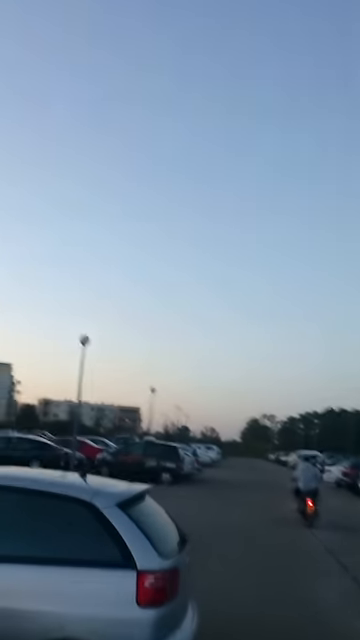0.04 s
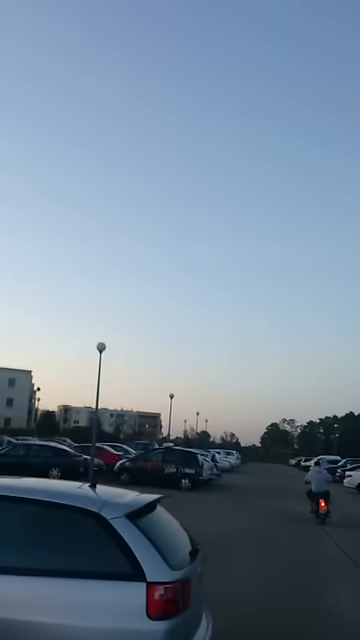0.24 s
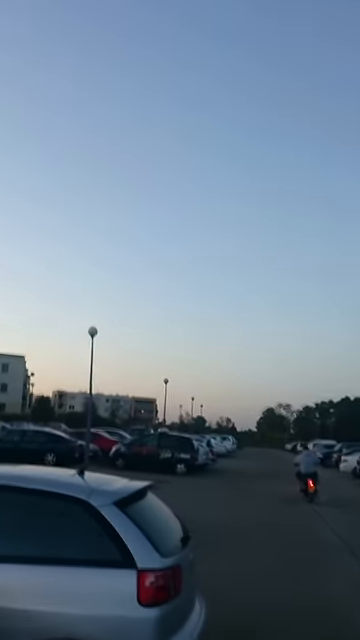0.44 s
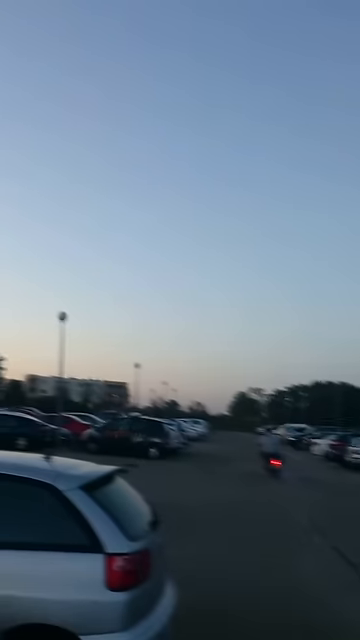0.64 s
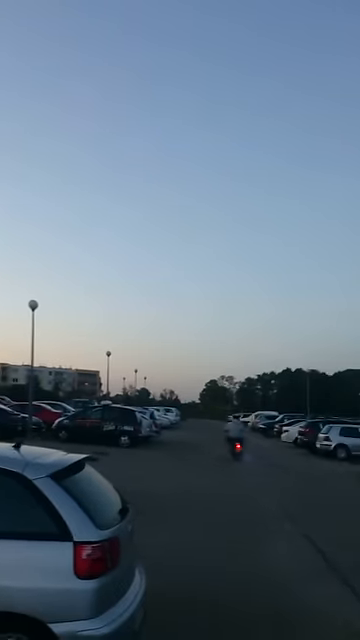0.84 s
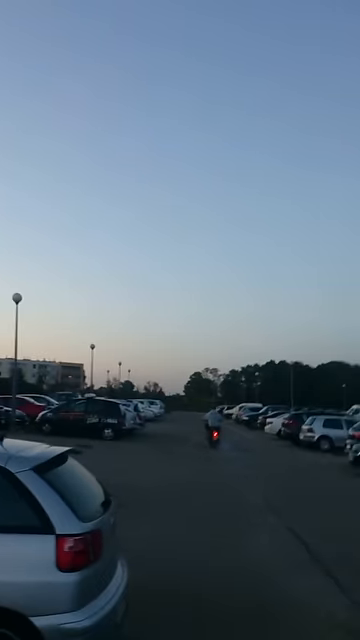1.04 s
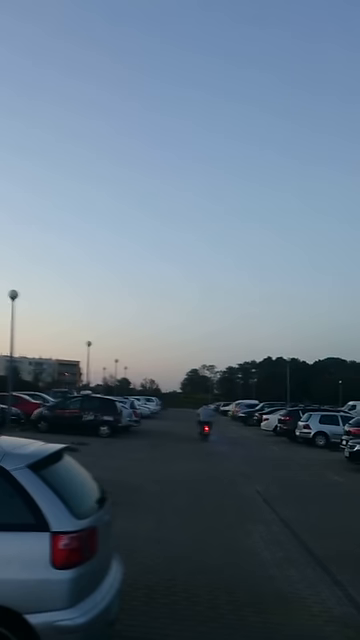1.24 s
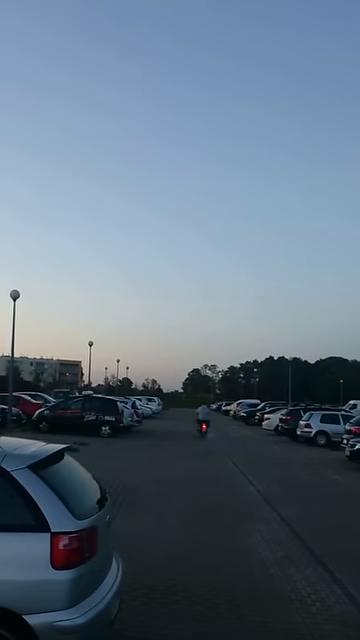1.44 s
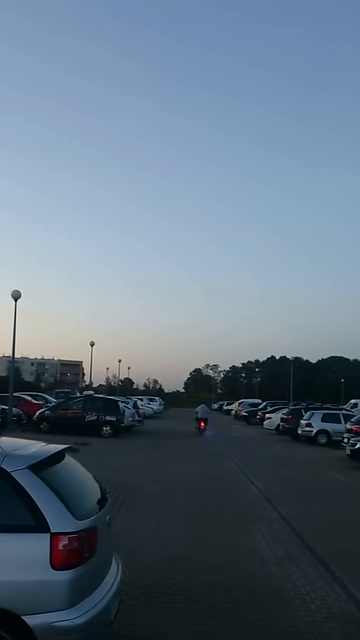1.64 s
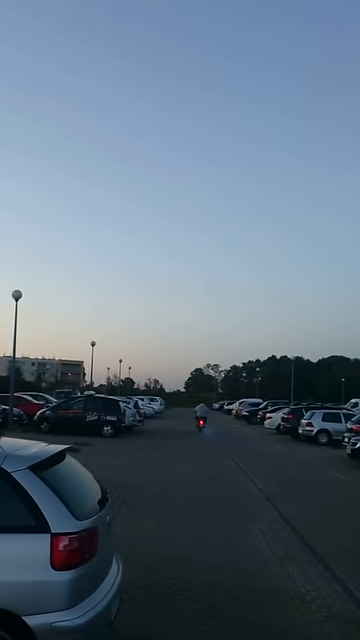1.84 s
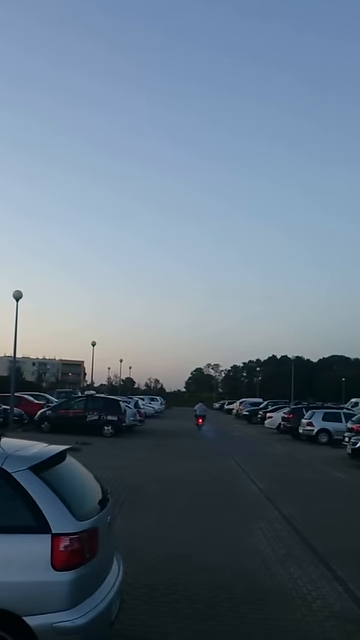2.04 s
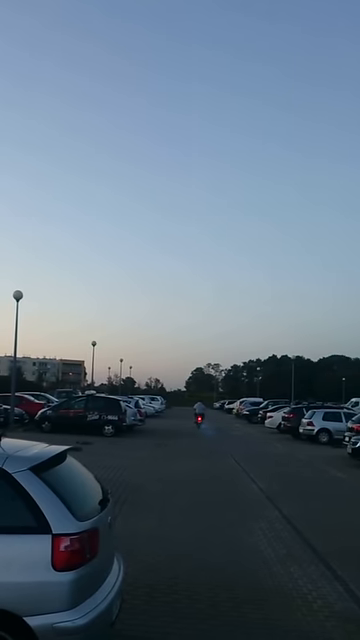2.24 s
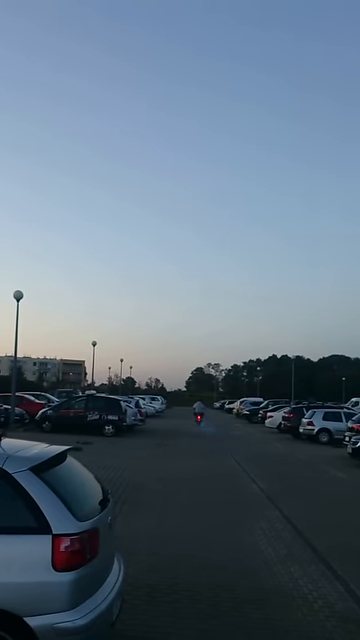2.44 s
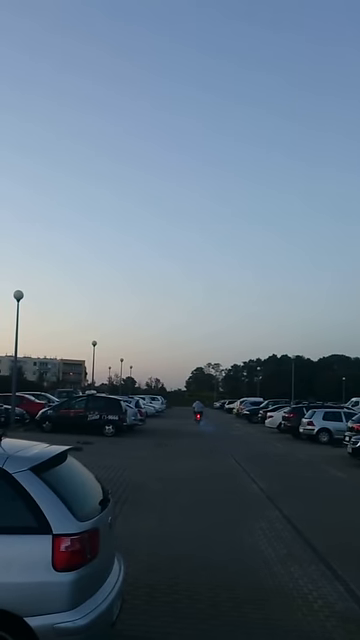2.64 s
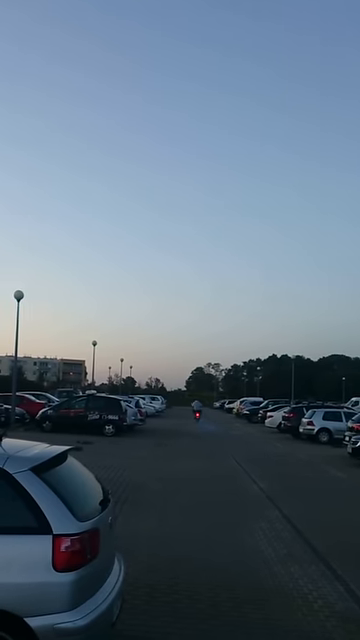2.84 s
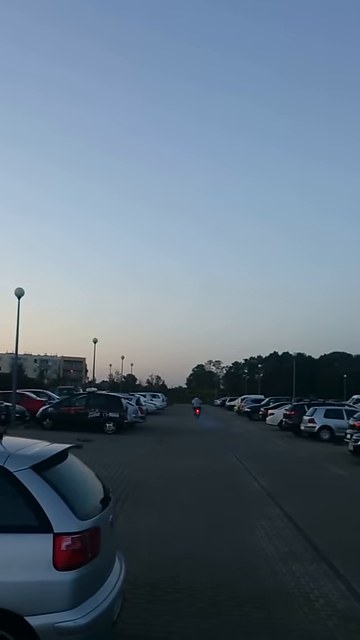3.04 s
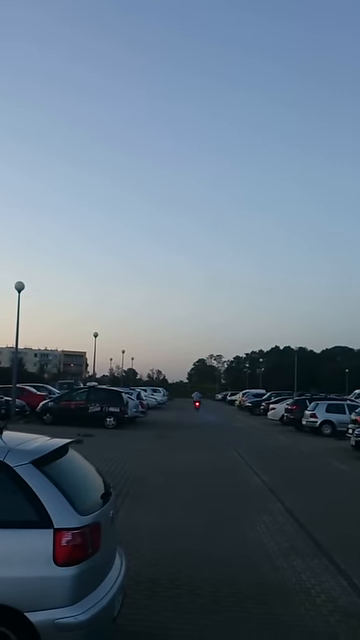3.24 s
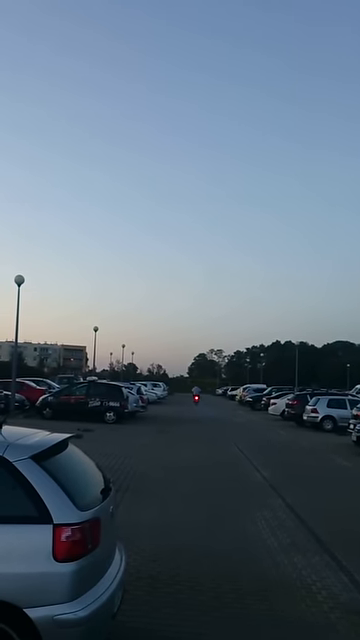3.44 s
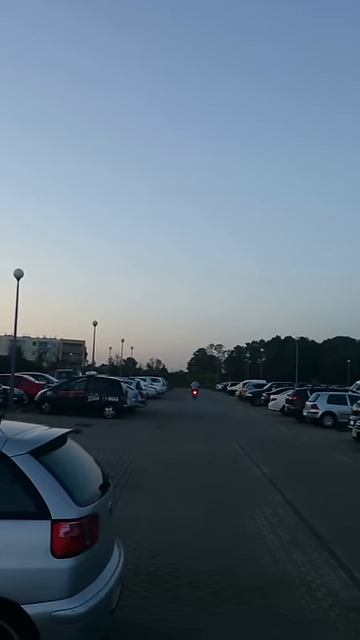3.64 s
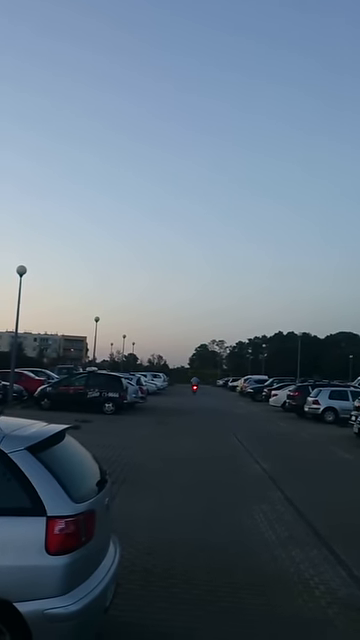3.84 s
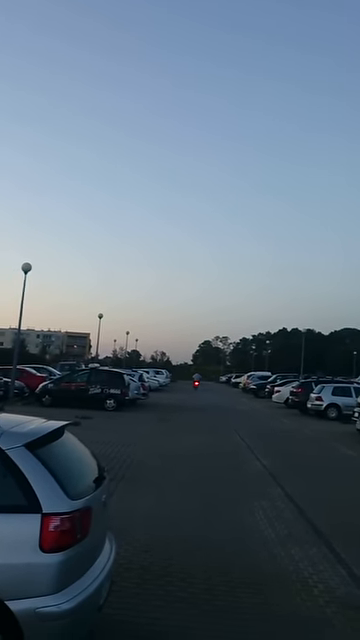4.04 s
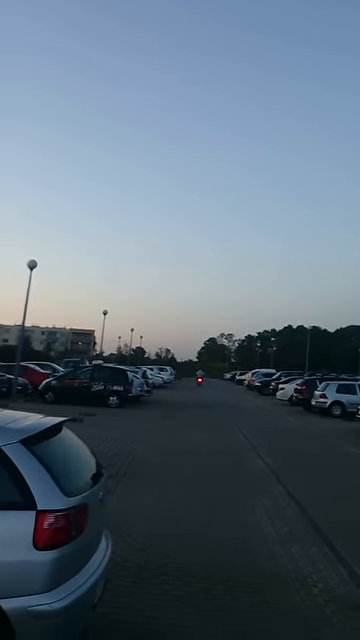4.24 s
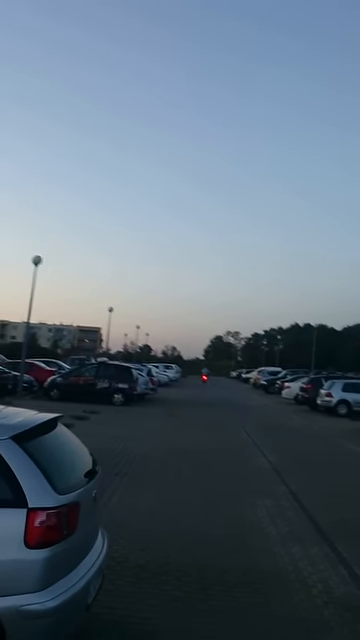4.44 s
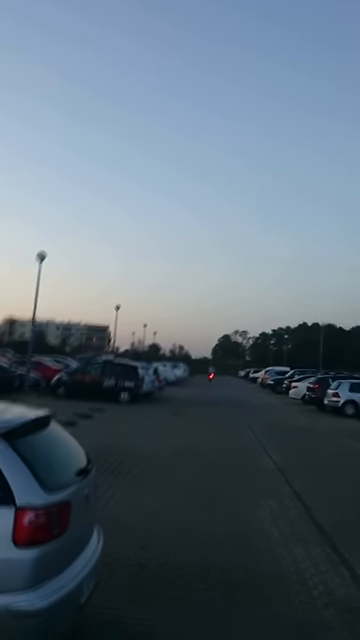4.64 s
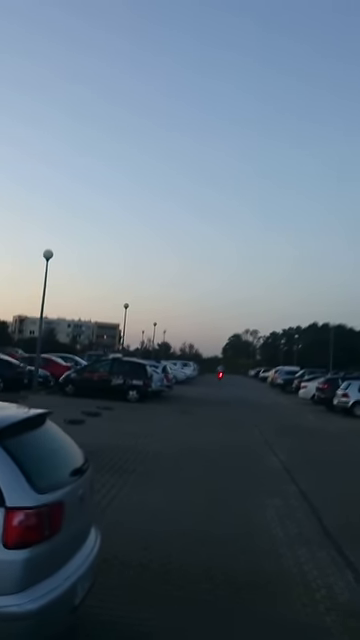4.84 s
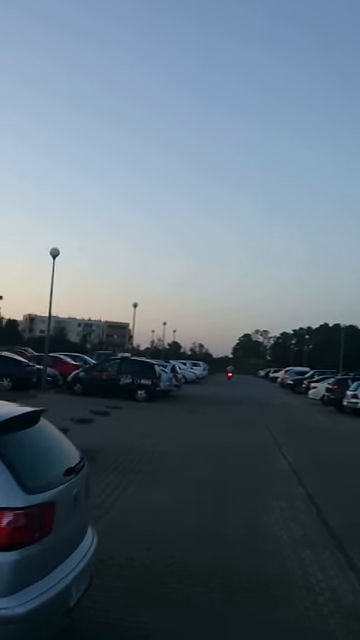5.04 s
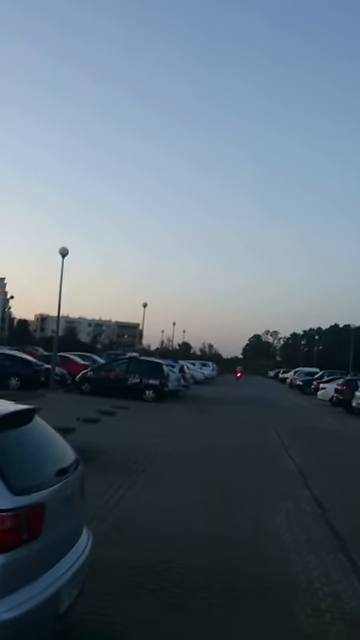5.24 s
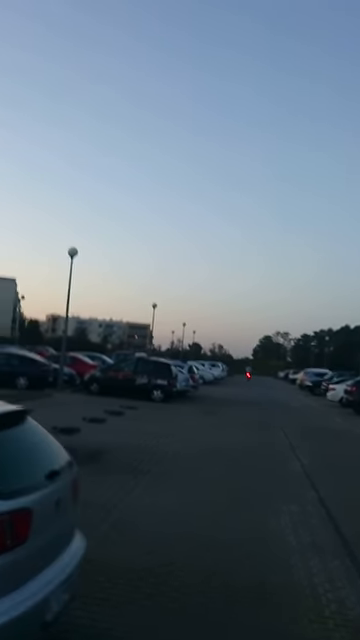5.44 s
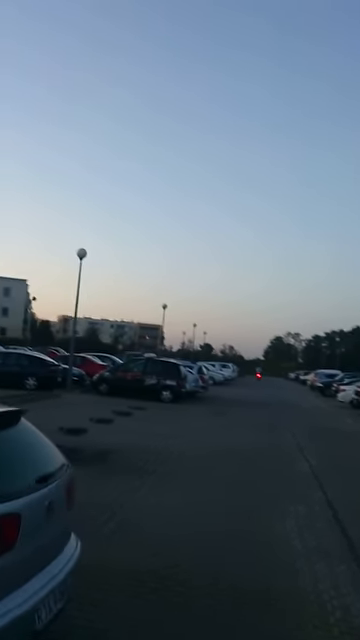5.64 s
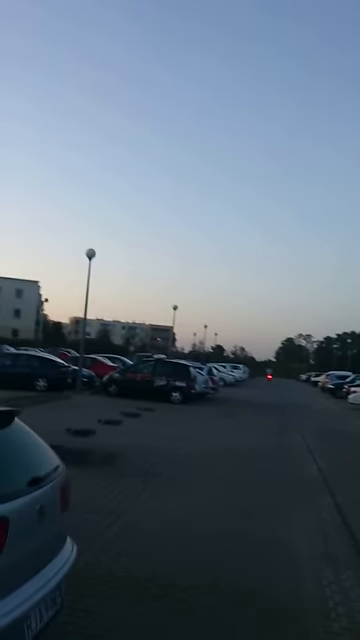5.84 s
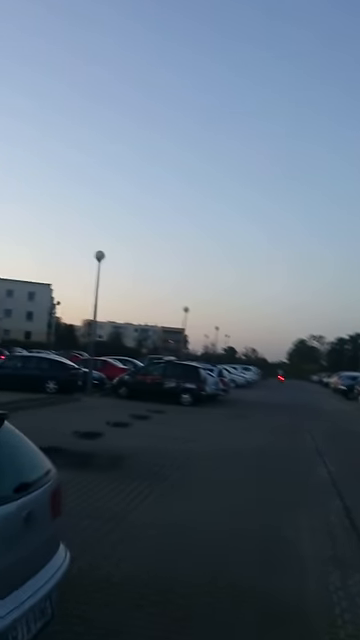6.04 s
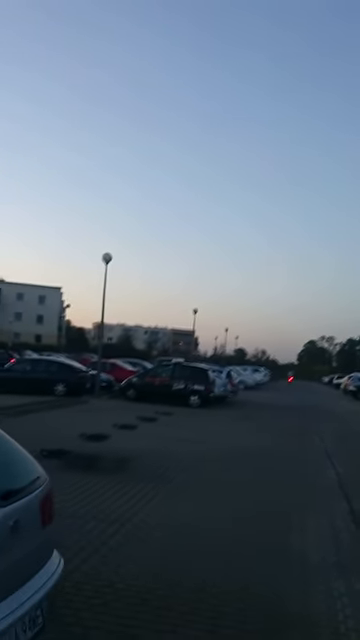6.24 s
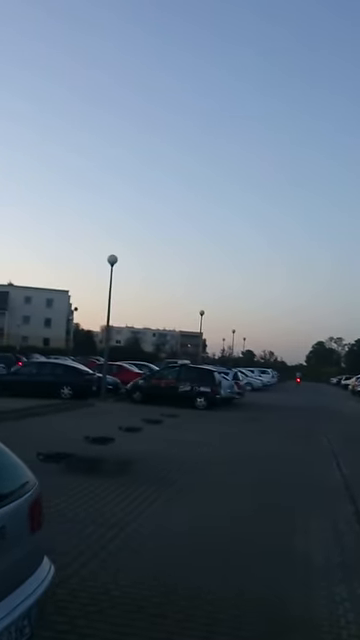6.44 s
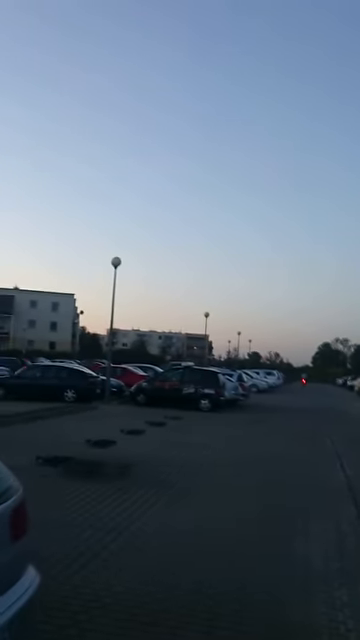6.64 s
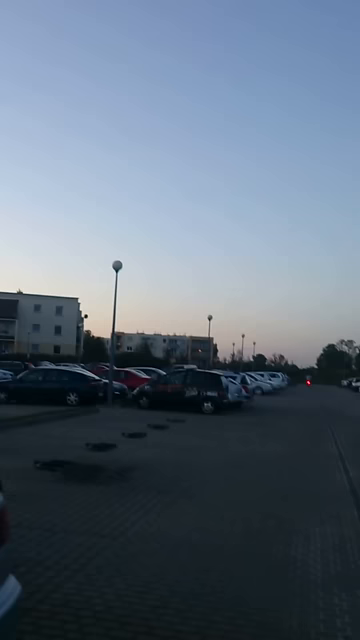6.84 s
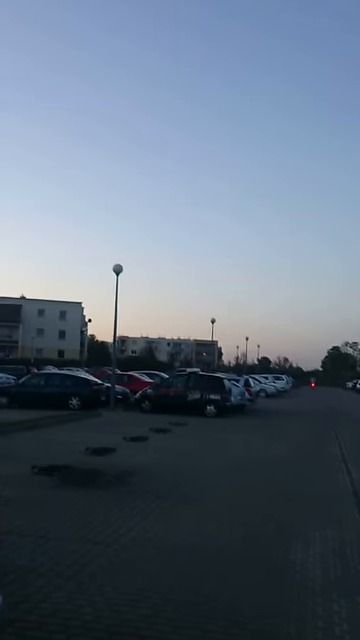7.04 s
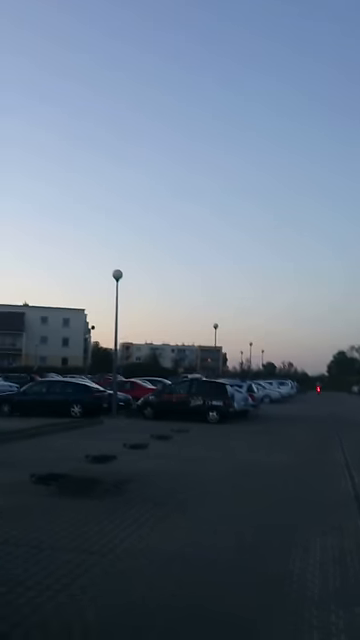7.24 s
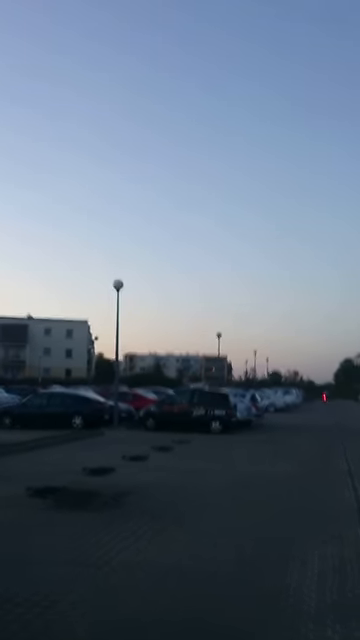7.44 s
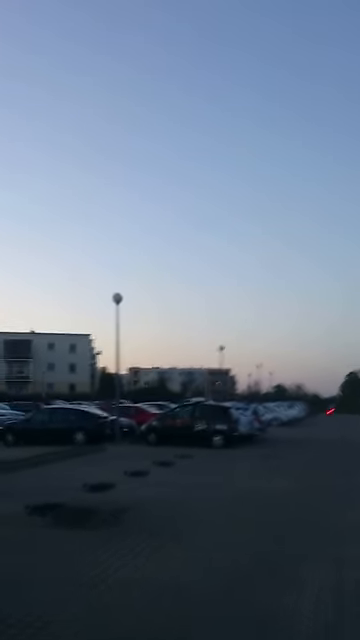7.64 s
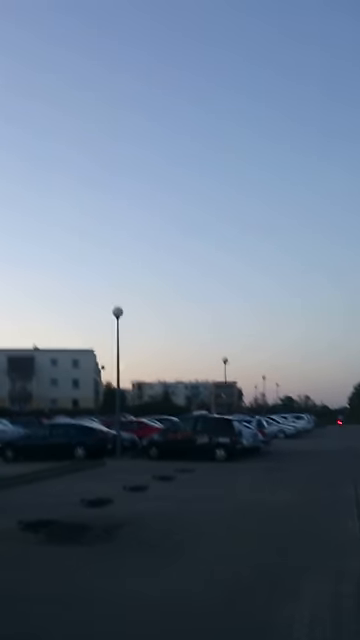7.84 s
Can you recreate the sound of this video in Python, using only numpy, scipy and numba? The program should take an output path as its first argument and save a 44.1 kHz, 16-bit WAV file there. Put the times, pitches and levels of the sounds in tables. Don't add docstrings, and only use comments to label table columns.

```python
import sys
import numpy as np
from scipy import signal
from scipy.fft import rfft, irfft, next_fast_len
from scipy.io import wavfile
from scipy.ndimage import uniform_filter1d, minimum_filter1d
from numba import njit

SR = 44100
rng = np.random.default_rng(int(sys.argv[2]) if len(sys.argv) > 2 else 0)


def elevation(decibels):
    levels = np.asarray(decibels, float)
    return 10 ** (levels / 20)


def master(y):
    cut = np.clip(np.atleast_2d(y).T, -1, 1)
    pcm = np.round(cut * 32767)
    wavfile.write(sys.argv[1], SR, pcm.astype(np.int16))


N = 348390

# (time [s], crank speed [turns per s], pipe level [dB])
PULL_GEARS = [
    [(0, 63.9, -16.5), (.2, 64.65, -17), (.5, 71.93, -17), (.66, 73.13, -17), (.82, 75.4, -18.5),
     (.96, 77.02, -19), (1.03, 75.58, -20.5)],
    [(1.334, 56.88, -23), (1.6, 57.99, -25), (2.1, 59.42, -24), (2.45, 60.44, -24.5), (2.6, 62.32, -23),
     (3.03, 63.74, -24), (3.15, 61.1, -28.5)],
]
# (first [s], last [s])
PULL_ENDS = [
    (.0083, 1.0282),
    (1.334, 3.1549),
]
# (levels as the pull starts [dB], levels as it ends [dB])
PULL_ORDERS = [
    ((-36.5, -33, -26), (-36, -30.5, -52)),
    ((-37.5, -33.5, -34), (-50, -45, -42)),
]
# (time [s], depth [turns per s])
CRANK_SAGS = [(0.121, 4), (.29, 1.5), (.42, 1.5), (0.551, 2), (.735, 4), (1.41, 2), (1.67, 2.2), (1.8, 3),
              (2.045, 2.4), (2.29, 1.5), (2.51, 1), (2.651, 2), (2.766, 3)]
# (first firing [s], last firing [s],
# firings, first peak [dB], second peak [dB])
OVERRUN_BURSTS = [(1.0545, 1.0551, 1, -8.5, -8), (1.109, 1.1214, 2, -16.5, -8),
                  (1.197, 1.204, 2, -17.5, -7.5), (1.272, 1.28, 1, -8, -8), (3.2113, 3.2323, 2, -11.5, -20),
                  (3.3167, 3.332, 2, -13.5, -13.5), (3.4163, 3.433, 2, -14.5, -13),
                  (3.516, 3.5318, 2, -11.5, -14.5), (3.621, 3.639, 2, -13, -13.5),
                  (3.724, 3.7422, 2, -12, -14.5), (3.8125, 3.8465, 3, -20, -11.5),
                  (3.9178, 3.952, 3, -18, -12.5), (4.0425, 4.0624, 2, -13, -14.5),
                  (4.132, 4.2805, 9, -14, -16.5), (4.3596, 4.4312, 5, -15.5, -15.5),
                  (4.511, 4.617, 7, -14.5, -17), (4.6658, 4.8215, 9, -25, -18.5),
                  (4.8855, 4.95, 4, -17.5, -15.5), (5.0377, 5.08, 3, -21, -16),
                  (5.2136, 5.2328, 2, -16.5, -15.5), (5.292, 5.3487, 4, -18.5, -16),
                 (5.493, 5.5465, 4, -22.5, -14.5), (5.692, 5.7393, 4, -20, -14.5),
                 (5.871, 5.9358, 5, -20, -18.5), (6.063, 6.13, 5, -23.5, -16.5),
                 (6.278, 6.3004, 2, -26.5, -31), (6.3335, 6.3501, 2, -22.5, -25),
                 (6.366, 6.419, 4, -15.5, -23.5), (6.4365, 6.502, 5, -20.5, -21.5),
                 (6.6216, 6.6974, 5, -28.5, -19.5), (6.7156, 6.7677, 4, -26, -23.5),
                 (6.9604, 6.9784, 2, -19, -20), (7.132, 7.2253, 6, -27.5, -19),
                 (7.396, 7.4166, 2, -21.5, -26), (7.554, 7.614, 4, -24, -21),
                 (7.792, 7.857, 4, -26.5, -24.5)]
# (first [s], last [s], turns)
SMOULDER_RUNS = [
    (5.5645, 5.6806, 8),
    (5.756, 5.854, 7),
]
# (time [s], rasp [dB], buzz [dB])
RASP_AND_BUZZ = [(0, 1.5, 4), (.2, -1.5, -4.5), (.5, -7.5, -6), (.72, 2.5, -2), (.88, 4, -6),
                 (1.05, -1, 0.5), (1.7, -1.5, 1), (2.3, 4, 3), (2.65, 5, -0.5), (2.9, 0, -4),
                 (3.7, 3.5, -0.5), (4.2, 1, 6), (4.7, -5.5, -6), (5.6, -1, 3), (6.0, 6, -1.5), (6.4, 2, -6),
                 (7.2, 2, -2), (7.9, -5, -6)]
# (time [s], upper mode level [dB])
PIPE_AIM = [(0, -7), (.9, -4), (1.6, -0.5), (3.8, 2), (5.0, -2.5), (7.3, -6), (7.9, -15)]
# (time [s], lift [%])
GAS_HEAT = [(0, 0), (1.0, 6.5), (1.3, 2), (1.5, 0.5), (2.3, 2), (3.1, 1), (3.8, 0), (7.9, 0)]
# (frequency [Hz], width [Hz], level [dB])
LOW_PIPE_MODES = [(162, 35, 3.5), (257, 79, -2.5), (414, 25.5, -6), (438, 35, -6.5), (512.2, 45, 2),
                  (578.7, 67, -5.5), (722, 135, -1), (891.7, 76.4, -0.5), (1008, 158, -1.5),
                  (1114, 118, -8.5), (1401, 54, -20)]
# (frequency [Hz], width [Hz], level [dB])
HIGH_PIPE_MODES = [(1630.6, 77, 1.5), (1755, 121, 4.5), (1967, 58, 4.5), (2120, 31, -20), (2410, 28, -11.5),
                   (2920, 70, -18.5)]
# (frequency [Hz], width [Hz], level [dB])
PUFF_PIPE_MODES = [(228, 47, 3.5), (384, 37, -5), (504, 39, -3), (644, 24, -13.5), (850, 48, -23),
                   (1634, 140, -37)]
# (delay [ms], level [dB])
PIPE_ROUND_TRIPS = [(6.8, -11.5), (12.4, -28.5), (19, -20)]
# (frequency [Hz], level [dB])
CRACK_COLOUR = [(3000, -29), (6500, -3.5), (8300, -9.5), (9200, 7.5), (10000, -7), (11500, -14),
                (15000, -23)]
# (frequency [Hz], level [dB per Hz])
HISS_COLOUR = [(1650, -4.5), (2800, 6), (3140, -3), (4210, -12.5), (5490, -8), (6330, -1), (7360, -4.5),
               (8250, -3.5), (9390, -3.5), (10400, -4), (11300, -7), (14600, -31.5), (15500, -19)]
# (frequency [Hz], level [dB per Hz])
FIN_COLOUR = [(4600, -10.5), (4950, -3), (5300, 2), (5550, 2.5), (5900, -4), (6300, -24)]
# (frequency [Hz], level [dB])
INTAKE_COLOUR = [(6500, -24.5), (7200, -4), (7550, 1.5), (7900, -11), (8600, -19)]
# (frequency [Hz], level [dB per Hz])
AIR_COLOUR = [(15, -36), (25, -22.5), (125, -23.5), (219, 9.5), (309, -13), (515, 9.5), (903, 7), (1390, 4),
              (1670, 6.5), (2930, -17), (5280, -23.5), (15000, -53)]
# (frequency [Hz], level [dB per Hz])
LEAF_COLOUR = [(2000, -27.5), (3200, -5), (4500, -3), (7000, -7.5), (9000, -16.5), (12000, -26)]
# (frequency [Hz], level [dB])
LEFT_COLOUR = [(30, -8), (120, -5.5), (300, -4.6), (600, -5.6), (1000, -7.2), (1900, -5), (4000, -5),
               (6000, -2), (8000, 1), (14000, 0)]
# (frequency [Hz], phase [rad])
LEFT_LEAD = [(0, 1), (500, -0.72), (1000, -0.09), (2400, 2.0), (5300, 6.5), (9000, 7.5), (15000, 16)]

SPEED_UP, SLOW_DOWN = .02, .011


def pulls():
    sag_s, sag_db_per_hz, order_lag_s = .04, 0.2, 0.0011
    shut_db, linger_db_per_s = 13, 23
    t = np.arange(N) / SR
    times, levels, low = [], [], np.zeros(N)
    for rows, (first, last), (start_db, end_db) in zip(PULL_GEARS, PULL_ENDS, PULL_ORDERS):
        hz, pipe_db = in_time(rows, t)
        sag_hz = sum(depth_hz * np.exp(-((t - at) / sag_s) ** 2) for at, depth_hz in CRANK_SAGS)
        hz = hz - sag_hz
        pipe_db = pipe_db - sag_db_per_hz * sag_hz
        turns = np.cumsum(hz) / SR
        start, end = np.interp([first, last], t, turns)
        count = round(end - start)
        turns = (turns - start) * count / (end - start)
        s = np.interp(np.arange(count + 1), turns, t)
        times.append(s)
        levels.append(np.interp(s, t, pipe_db) + 11.5)
        fall_db = shut_db * np.clip((t - last) / 0.029, 0, 1) + linger_db_per_s * np.maximum(t - last, 0)
        bite = np.clip((t - first) / 0.045 + 1, 0, 1) * elevation(-fall_db)
        orders_db = in_time([(first, *start_db), (last, *end_db)], t)
        for order, db in enumerate(orders_db, 1):
            low -= bite * elevation(db) * np.cos(2 * np.pi * order * (turns - order_lag_s * hz))
    return np.concatenate(times), np.concatenate(levels), low


def bursts():
    spent_db = 4.5
    weak_db = -26.5
    times, levels = [], []
    for first, last, firings, first_db, second_db in OVERRUN_BURSTS:
        k = np.arange(round(firings))
        spent = (np.maximum(k - 1, 0) / max(len(k) - 2, 1)) ** 2
        change = SPEED_UP * min(1, 4 / len(k)) if second_db > weak_db else -SLOW_DOWN
        times.append(first + (last - first) * paced(len(k) - 1, change))
        levels.append(np.where(k == 0, first_db, second_db - spent_db * spent))
    return np.concatenate(times), np.concatenate(levels)


def colour(s):
    rasp_db, buzz_db = in_time(RASP_AND_BUZZ, s)
    # (level dB, share of rasp, share of buzz, loss with distance dB per s)
    fins, hiss, crack = (-24, 0.43, 1.2, 0.46), (-22.5, 0.7, 0.07, 2.08), (-17.5, 3.4, 0.43, 3.5)
    return in_time(PIPE_AIM, s) + [db + by_rasp * rasp_db + by_buzz * buzz_db - loss_db * s
                                   for db, by_rasp, by_buzz, loss_db in (fins, hiss, crack)]


def firings():
    travel_s = 0.002
    uneven = 1.5
    pull_s, pull_db, low = pulls()
    burst_s, burst_db = bursts()
    s = np.concatenate([pull_s, burst_s]) + travel_s
    chance_db = rng.standard_normal((len(s), 4)) * [.8, 1.1, 2, 2]
    lean = np.where(s > PULL_ENDS[1][1], uneven, 1)
    height = elevation(np.concatenate([pull_db, burst_db]) + chance_db[:, 0] * lean)
    upper_db, fins_db, hiss_db, crack_db = colour(s)
    levels_db = (upper_db + chance_db[:, 1], fins_db + chance_db[:, 3],
                 hiss_db + chance_db[:, 3], crack_db + chance_db[:, 2])
    return s, height, low, levels_db


def unfired(fired):
    gaps = np.diff(fired)
    pace = uniform_filter1d(minimum_filter1d(gaps, size=3), size=3) * 1.07
    turns = np.maximum(np.round(gaps / pace), 1).astype(int)
    return np.concatenate([s + gap * paced(n, -SLOW_DOWN)[1:-1] for s, gap, n in zip(fired, gaps, turns)])


def puffs(s):
    level_db, loss_db_per_s, travel_s = -27.5, 1.13, 0.002
    rich_s, rich_length_s, rich_db = 5.73, 0.12, 9
    half_lit = np.concatenate([first + (last - first) * paced(round(turns) - 1, -SLOW_DOWN)
                               for first, last, turns in SMOULDER_RUNS]) + travel_s
    taken = np.sort(np.concatenate([s, half_lit, [N / SR + 0.038]]))
    at = np.append(unfired(taken), half_lit)
    rich = np.exp(-((at - rich_s) / rich_length_s) ** 2)
    db = level_db - loss_db_per_s * at + rich_db * rich + rng.standard_normal(len(at))
    return clicks(at, elevation(db))


def exhaust_pipe(s, height, upper_db, puff_pulses, white):
    low_in = clicks(s, height)
    low_in = low_in + elevation(-43) * dying(low_in, t60=.05) * white[0]
    low_in = low_in + elevation(-14.5) * (repeats(low_in) - low_in)
    high_in = clicks(s + 0.00035, height * elevation(upper_db))
    high_in = repeats(high_in + elevation(-33) * dying(high_in, t60=.05) * white[1])
    pipe = modes(high_in, HIGH_PIPE_MODES) * elevation(-11.5) - modes(low_in, LOW_PIPE_MODES) * elevation(-10.5)
    pipe -= modes(puff_pulses, PUFF_PIPE_MODES) * elevation(-5.0)
    pipe = signal.sosfilt(signal.butter(2, [260, 2900], "band", fs=SR, output="sos"), pipe)
    pipe = signal.sosfilt(signal.butter(3, 190, "high", fs=SR, output="sos"), pipe)
    shade_s, shade_length_s, shade_hz = 2.97, 1, 2380
    shade = np.clip((np.arange(N) / SR - shade_s) / shade_length_s, 0, 1)
    dull = signal.sosfiltfilt(signal.butter(3, shade_hz, fs=SR, output="sos"), pipe)
    return pipe + shade * (dull - pipe)


def repeats(x):
    out = x.copy()
    for ms, db in PIPE_ROUND_TRIPS:
        lag = int(ms * SR / 1000)
        out[..., lag:] += elevation(db) * x[..., :-lag]
    return out


def port_crack(s, height, crack_db):
    return shaped(clicks(s + 0.0013, height * elevation(crack_db + 24.0)), CRACK_COLOUR)


def gas_hiss(s, height, hiss_db, white):
    burst = repeats(dying(clicks(s, height * elevation(hiss_db)), t60=0.046))
    burst += elevation(-35.5) * dying(burst, t60=0.45) / 100
    return burst * rms_one(shaped(spread(white[2], .6 * white[3]), HISS_COLOUR))


def fin_ring(s, height, fins_db, white):
    shake = dying(clicks(s, height * elevation(fins_db)), t60=0.05)
    shake += elevation(-36.5) * dying(shake, t60=0.56) / 100
    shake = uniform_filter1d(shake, size=260, origin=120)
    return shake * rms_one(shaped(spread(white[4], .45 * white[5]), FIN_COLOUR))


def intake(s, height, white):
    level_db, loss_db_per_s = -25, 9
    gulps = dying(clicks(s, height * elevation(level_db - loss_db_per_s * s)), t60=0.072)
    return gulps * rms_one(shaped(white[3], INTAKE_COLOUR))


def engine():
    s, height, low, (upper_db, fins_db, hiss_db, crack_db) = firings()
    puff_pulses = puffs(s)
    white = rng.standard_normal((6, N))
    tone = exhaust_pipe(s, height, upper_db, puff_pulses, white) + low + port_crack(s, height, crack_db)
    rattle = gas_hiss(s, height, hiss_db, white) + fin_ring(s, height, fins_db, white)
    return tone, rattle + intake(s, height, white)


def cars(x):
    t60_s, level_db, band_hz = .13, -15, [500, 3140]
    t = np.arange(int(.6 * SR)) / SR
    tail = rng.standard_normal((2, len(t))) * elevation(-60 * t / t60_s) * (t > .004)
    tail[0] = .8 * tail[1] + .6 * tail[0]
    tail = signal.sosfilt(signal.butter(2, band_hz, "band", fs=SR, output="sos"), tail)
    tail /= np.sqrt(np.sum(tail[1] ** 2))
    return elevation(level_db) * signal.fftconvolve(x[None], tail, axes=1)[:, :N]


def distance(x):
    far = np.clip((np.arange(N) / SR - 2.9) / 1.14, 0, 1)
    return x + far * (signal.sosfiltfilt(signal.butter(1, 9500, fs=SR, output="sos"), x) - x)


def air():
    gust_s, gust_length_s, gust_rise_s, gust_db, calm_db = 5.31, 2.1, 0.083, -61, -70.5
    mid, side, wind, gust = rng.standard_normal((4, N))
    floor = elevation(-50) * rms_one(shaped(spread(mid, 0.27 * side), AIR_COLOUR))
    since = np.arange(N) / SR - gust_s
    blowing = np.clip(np.minimum(since, gust_length_s - since) / gust_rise_s, 0, 1)
    rustle = rms_one(shaped(spread(side, 0.99 * wind), LEAF_COLOUR))
    leaves = elevation(calm_db + (gust_db - calm_db) * blowing) * rustle
    lumps = elevation(3 * rms_one(signal.sosfilt(signal.butter(2, 3, fs=SR, output="sos"), gust)))
    breeze = rms_one(signal.sosfilt(signal.butter(2, [15, 62], "band", fs=SR, output="sos"), wind))
    return floor + leaves + elevation(-49.5) * lumps * breeze


def rms_one(x):
    return x / np.sqrt(np.mean(x ** 2) + 1e-20)


def spread(mid, side):
    return mid + side * np.array([[1], [-1]])


def in_time(rows, s):
    at, *columns = np.transpose(rows)
    return [np.interp(s, at, c) for c in columns]


def shaped(x, points, lead=((0, 0), (1, 0))):
    size = next_fast_len(N + 8192)
    hz = np.maximum(np.fft.rfftfreq(size, 1 / SR), 1)
    at_hz, db = np.transpose(points)
    gain = elevation(np.interp(np.log(hz), np.log(at_hz), db))
    turn = np.exp(1j * np.interp(hz, *np.transpose(lead)))
    return irfft(rfft(x, size) * gain * turn, size)[..., :N]


def clicks(s, height):
    at, out = np.clip(s * SR, 0, N - 2), np.zeros(N)
    whole = at.astype(int)
    np.add.at(out, whole, height * (1 - at + whole))
    np.add.at(out, whole + 1, height * (at - whole))
    return out + 1e-18


def dying(x, t60):
    return signal.lfilter([1], [1, -elevation(-60 / (t60 * SR))], x)


def paced(turns, change):
    u = np.arange(turns + 1) / max(turns, 1)
    return u + change * turns * u * (1 - u)


def modes(x, table):
    out, lift = 0, 1 + in_time(GAS_HEAT, np.arange(N) / SR)[0] / 100
    for hz, width_hz, db in table:
        out = out + elevation(db) * resonate(x, 2 * np.pi * hz / SR * lift, np.exp(-np.pi * width_hz / SR), 64)
    return out


@njit
def resonate(x, w, r, step):
    out, gain, feed = np.zeros(len(x)), 0., 0.
    for i in range(2, len(x)):
        if i % step == 2:
            gain, feed = np.sin(w[i]), 2 * r * np.cos(w[i])
        out[i] = gain * x[i - 1] + feed * out[i - 1] - r * r * out[i - 2]
    return out


def scene():
    tone, rattle = engine()
    wetter = elevation(0.54 * np.arange(N) / SR)
    echoes = cars((tone + rattle[0]) * wetter)
    left, right = distance(tone + rattle + echoes) * elevation(2.5) + air()
    return np.array([shaped(left, LEFT_COLOUR, LEFT_LEAD), right])


def band_limit(x):
    return signal.sosfilt(signal.butter(12, 15830, fs=SR, output="sos"), x)


def record(dry):
    mix = np.clip(dry, -1, 1)
    return band_limit(mix)


dry = scene()
out = record(dry)
master(out)
```